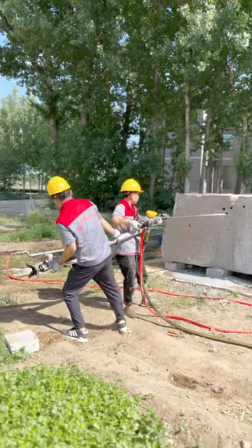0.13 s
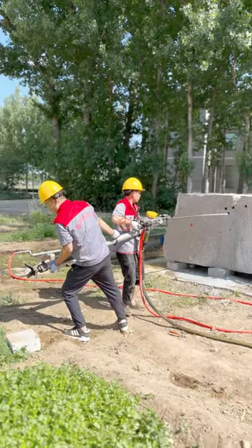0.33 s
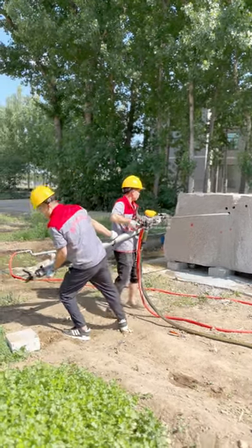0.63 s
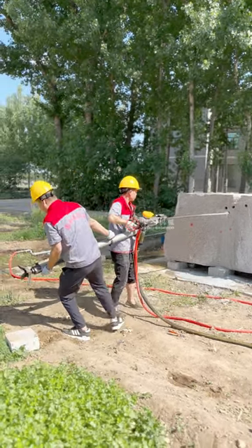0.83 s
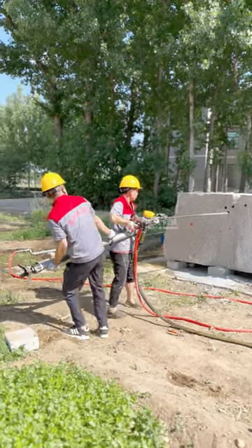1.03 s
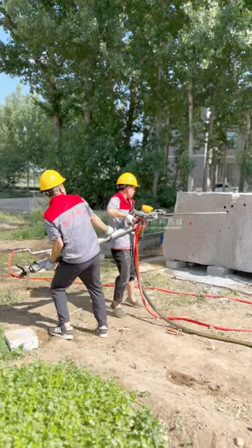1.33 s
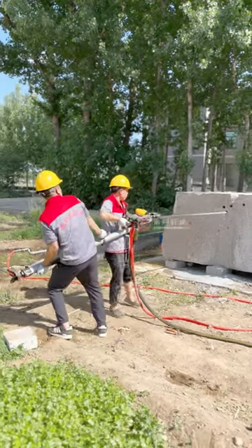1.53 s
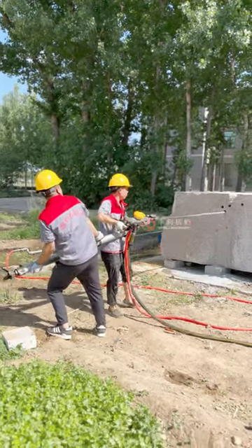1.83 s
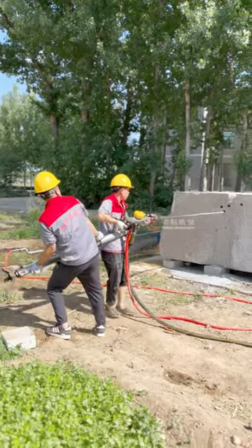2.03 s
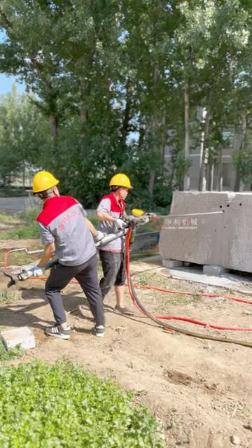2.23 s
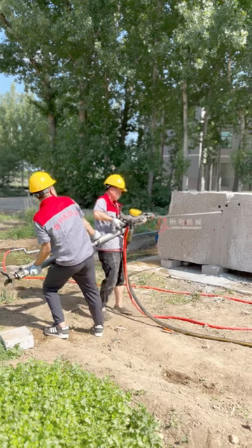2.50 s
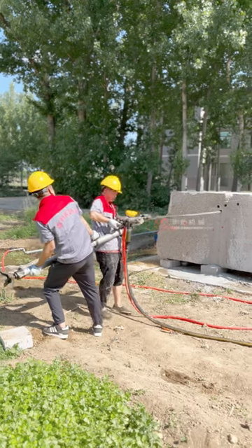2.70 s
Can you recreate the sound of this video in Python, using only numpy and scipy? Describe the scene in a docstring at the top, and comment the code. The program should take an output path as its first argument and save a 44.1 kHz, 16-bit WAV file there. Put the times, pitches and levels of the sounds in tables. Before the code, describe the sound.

An air-powered rock drill runs from 0 to about 2.9 seconds without starting or stopping, hammering roughly 25 times a second. Low coarse exhaust puffs fuse into a roar under pulsing air hiss, with fast bright steel clicks and rattles. A breathy whistling note near 1100 Hz weakens after about 1 second as the roar's tone shifts; metallic ringing swells briefly near 1.55 and 2.3 seconds. Open air, dry, wide stereo.

```python
"""A low, coarse roar at about 25 piston cycles a second: an air-driven rock drill, in the open air.
Exhaust puffs time the multiples of the cycle rate in the roar, and the port whistles a breathy note.
Clicks and rattles ring the modes of steel and housing; shaped noise with bursts makes the hiss.
Left and right differ in phase, level and likeness by frequency, which widens the image."""
import sys
import numpy as np
from scipy import signal
from scipy.fft import rfft, irfft, next_fast_len
from scipy.io import wavfile

SR = 44100
rng = np.random.default_rng(int(sys.argv[2]) if len(sys.argv) > 2 else 0)


def boost_factor(decibels):
    """Convert a level in decibels to a linear amplitude factor."""
    exponent = np.asarray(decibels, float) / 20
    return 10 ** exponent


def bounce(signal):
    """Save signal as a 16-bit WAV file at the path given by the first command-line argument."""
    frames = np.transpose(np.atleast_2d(signal))
    limited = np.clip(frames, -1, 1)
    pcm = np.round(limited * 32767).astype(np.int16)
    wavfile.write(sys.argv[1], SR, pcm)


N = 126126

# Piston clock. Each row: time in seconds, cycles done.
CLOCK = [(-.039, -3), (.0807, 0), (.3998, 8), (.7199, 16), (1.0404, 24), (1.3612, 32), (1.4416, 34),
         (1.5637, 37), (1.846, 44), (2.0884, 50), (2.4139, 58), (2.7407, 66), (2.9037, 70)]
# Ringing parts, named by the contact table. Each row: mode in Hz, width in Hz.
ROD = [(8200, 170), (8390, 140), (8640, 190)]
# Modes of the shank, same columns: mode in Hz, width in Hz.
SHANK = [(4110, 110), (4250, 110), (4440, 200)]
# Modes of the housing, same columns: mode in Hz, width in Hz.
HOUSING = [(2700, 200), (3080, 170), (3280, 120), (3500, 220)]
# Modes of the valve, same columns: mode in Hz, width in Hz.
VALVE = [(1930, 110), (2130, 110)]
# Modes of the collar, same columns: mode in Hz, width in Hz.
COLLAR = [(5950, 150), (7150, 350)]
# Modes of the chuck, same columns: mode in Hz, width in Hz.
CHUCK = [(11300, 700), (12600, 900)]


def rms_one(x):
    """Scales to rms 1."""
    return x / np.sqrt(np.mean(x ** 2) + 1e-20)


def in_time(rows):
    """Columns of a curve at every sample."""
    s, *columns = np.transpose(rows)
    return [np.interp(np.arange(N) / SR, s, column) for column in columns]


def drift(corner_hz):
    """Slow random curve of rms about 1: noise through two equal poles, drawn every 40 samples."""
    r = np.exp(-2 * np.pi * corner_hz * 40 / SR)
    noise = rng.standard_normal(N // 40 + 1002)
    slow = signal.lfilter([1], [1, -2 * r, r * r], noise)[1000:]
    return np.interp(np.arange(N) / 40, np.arange(len(slow)), rms_one(slow))


def resonate(x, hz, width_hz):
    """Two-pole resonance, gain about 1 on top."""
    r = np.exp(-np.pi * width_hz / SR)
    poles = [1, -2 * r * np.cos(2 * np.pi * hz / SR), r * r]
    return signal.lfilter([(1 - r * r) / 2, 0, (r * r - 1) / 2], poles, x)


def bursts(place, decay_ms):
    """One rising and dying envelope a cycle, of uneven strength and timing; also its first touch."""
    jitter_ms, spread_db, rise_ms = .25, 1.6, .3
    s, turns = np.transpose(CLOCK)
    cycle = np.arange(turns[0], turns[-1])
    luck = rng.standard_normal((len(cycle), 2))
    at = (np.interp(cycle + place, turns, s) + jitter_ms / 1000 * luck[:, 0]) * SR
    inside = (at >= 0) & (at < N - 1)
    first = np.full(N, 1e-18)
    first[at[inside].astype(int)] = boost_factor(spread_db * luck[inside, 1])
    fall = np.exp(-1000 / (decay_ms * SR))
    rise = np.exp(-1000 / (rise_ms * SR))
    dying = signal.lfilter([1], [1, -fall], first)
    return signal.lfilter([1 - rise], [1, -rise], dying), first


def air():
    """Broad air noise that swells when the valves open."""
    # Hiss bursts. Each row: place in cycle 0-1, drive over the steady hiss in dB, decay in ms.
    jets = [(.02, 2, 5.0), (.33, 1, 3.0), (.75, -10.5, 2.0), (.945, 5.5, 1.2)]
    # Air colour. Each row: Hz, relative density in dB.
    air_colour = [(40, -16), (100, -5), (200, -6), (330, -4), (470, -7), (650, -5), (800, -6), (950, -9),
                  (1350, -9), (1700, -14), (2100, -11), (2480, -11.5), (3200, -10), (3800, -14.5),
                  (4300, -12), (5300, -13), (5950, -8), (6400, -12), (7400, -13), (7750, -16), (9500, -14),
                  (11300, -16), (12200, -20), (14000, -21), (15000, -22), (15800, -22.5)]
    level_db, flicker_db, flicker_hz = -26.5, .7, 13.7
    swell = 1 + sum(boost_factor(db) * bursts(place, decay_ms)[0] for place, db, decay_ms in jets)
    noise = rng.standard_normal((2, N)) * swell * boost_factor(flicker_db * drift(flicker_hz))
    colour_hz, colour_db = np.transpose(air_colour)
    hz = np.fft.rfftfreq(N, 1 / SR)
    gain = boost_factor(np.interp(np.log(hz + 1), np.log(colour_hz + 1), colour_db))
    return boost_factor(level_db) * rms_one(irfft(rfft(noise) * gain, N))


def port(turns, feed):
    """Air leaving the port whistles a breathy note for part of each cycle, later under heavier feed."""
    # Centre of the note in the cycle 0-1: at light feed, at heavy feed.
    port_at = (.17, .42)
    note_hz, width_hz, half_length_cycles = 1098, 130, .1
    light_db, heavy_db = -37.5, -45
    wander_rad, wander_hz, breath_share = 1.5, 25.0, .35
    centre = port_at[0] + feed * (port_at[1] - port_at[0])
    off_centre = (turns - centre + .5) % 1 - .5
    gate = np.exp(-.5 * (off_centre / half_length_cycles) ** 2)
    wander = wander_rad * np.array([drift(wander_hz), drift(wander_hz)])
    whistle = np.cos(2 * np.pi * note_hz * np.arange(N) / SR + wander)
    breath = resonate(rng.standard_normal((2, N)), note_hz, width_hz)
    breath = rms_one(resonate(breath, note_hz, width_hz))
    note = rms_one(gate * (whistle + breath_share * breath))
    return boost_factor(light_db + feed * (heavy_db - light_db)) * note


def knocks():
    """Each contact is a click and a dying rattle that ring one part's modes; two draws of the rattle."""
    # Each row: part struck, place in cycle 0-1, relative drive in dB, rattle decay in ms.
    contacts = [(ROD, .335, 6.5, .6), (ROD, .425, 4.5, .8), (ROD, .495, 1, 1.2), (ROD, .785, 4, .7),
                (ROD, .03, -4, 1.5), (COLLAR, .335, -4, .8), (COLLAR, .02, -13, 1.2), (SHANK, .74, -1, 1.5),
                (SHANK, .945, 0, .5), (SHANK, .01, -7, 1.2), (HOUSING, .025, -4, 1.4),
                (HOUSING, .28, -2, 1.2), (HOUSING, .44, -6.5, 2.5), (HOUSING, .765, -5, .7),
                (HOUSING, .945, -5.5, .7), (VALVE, .955, -11, 1.0), (VALVE, .04, -10, 2.5),
                (VALVE, .3, -7.5, 4.0), (VALVE, .76, -10, 1.5), (CHUCK, .68, -6, 1.2), (CHUCK, .76, 0, 1.0),
                (CHUCK, .945, -2, .7)]
    # Shank and housing ring harder at times. Each row: seconds, shank in dB, housing in dB.
    swells = [(0, 7, -1.5), (.08, 6, -1.5), (.2, -7, .6), (.45, -2.5, 1.5), (.9, 2, .6), (1.3, 2.1, -1.5),
              (1.55, 6, -1.5), (1.7, 1.5, -.6), (2.1, 3, -.6), (2.3, 10.5, -1.5), (2.45, -2.5, -2.5),
              (2.86, -.6, -2.5)]
    first_db, rattle_per_s = 1.5, 1800
    loose_db, loose_hz = 2.0, 15.0  # all parts but the rod are struck less evenly
    shank_db, housing_db = in_time(swells)
    out = 0
    for part, place, db, decay_ms in contacts:
        envelope, first = bursts(place, decay_ms)
        rattle = envelope * (rng.random((2, N)) < rattle_per_s / SR)
        touches = (boost_factor(first_db) * first + rattle) * rng.choice([-1, 1], (2, N))
        if part != ROD:
            db = db + loose_db * drift(loose_hz)
        if part == SHANK:
            db = db + shank_db
        if part == HOUSING:
            db = db + housing_db
        for k, (hz, width_hz) in enumerate(part):
            ring = resonate(boost_factor(db) * touches, hz, width_hz)
            out = out + ring * SR / width_hz / 4 * (-1) ** k
    return out


def roar(turns, feed):
    """Multiples of the cycle rate, lined up on the exhaust puffs; narrow puffs lead the high ones."""
    # Each row: place in cycle 0-1 at light feed, at heavy, pressure step at light, at heavy, width in ms.
    puffs = [(.119, .141, -.57, -.91, .94), (.177, .213, .54, -.03, .58), (.297, .298, -.68, -.33, .56),
             (.349, .345, -1.0, -.69, .84), (.425, .428, -.69, -1.0, 1.37), (.64, .625, -1.56, -.61, 2.54),
             (.716, .557, -.15, -.28, 1.47), (.709, .765, -.23, .26, .3), (.804, .783, -1.14, .01, .2),
             (.892, .922, -.53, .16, .53), (.987, .972, .34, .79, .87)]
    # Each row: multiple of the cycle rate, relative level in dB at light, middle and heavy feed.
    order_levels = [(1, -41, -42, -40), (2, -11.5, -9.5, -10), (3, -38, -23, -16), (4, -2.5, -0.5, -.5),
                    (5, -6.5, -2.5, -0.5), (6, 0, -4, -11), (7, -15, -20, -8.5), (8, -20, -11.5, -13.5),
                    (9, -5, -2, -4.5), (10, -8, -22, -27), (11, -12.5, -11, -19), (12, -6.5, -2.5, -6),
                    (13, -5, -6, -9.5), (14, -9, -16, -8.5), (15, -13.5, -9.5, -5), (16, -14.5, -10.5, -8),
                    (17, -18, -18, -20), (18, -19, -20.5, -11.5), (19, -18, -35, -16.5),
                    (20, -15.5, -14, -18.5), (21, -20, -22, -15.5), (22, -7, -10.5, -19),
                    (23, -18, -18, -12.5), (24, -20, -15, -21), (25, -13.5, -10, -20),
                    (26, -12, -17.5, -19), (27, -25, -23, -16.5), (28, -37, -18, -16), (29, -31, -17, -22),
                    (30, -31, -37, -25), (31, -27, -25, -20), (32, -33, -30, -21.5)]
    waver_db, waver_rad, waver_hz = .8, .009, 6.0  # dB at the 4th multiple, rad per multiple
    light_at, heavy_at, light, heavy, width_ms = np.transpose(puffs)
    lean = np.linspace(0, 1, 41)[:, None]
    place = light_at + lean * (heavy_at - light_at)
    pressure = light + lean * (heavy - light)
    out = 0
    for k, *db in order_levels:
        blur = np.exp(-2 * (np.pi * k * 25 * width_ms / 1000) ** 2)  # at 25 cycles a second
        shape = pressure * width_ms * blur * np.exp(-2j * np.pi * k * place)
        start = np.interp(feed, lean[:, 0], np.unwrap(np.angle(shape.sum(axis=1))))
        level_db = np.interp(feed, [0, .6, 1], db)
        level = boost_factor(level_db + waver_db * np.sqrt(k / 4) * drift(waver_hz))
        out = out + level * np.cos(2 * np.pi * k * turns + start + waver_rad * k * drift(waver_hz))
    return rms_one(out)


def stereo_image(middle, second_draw):
    """Sets left-right phase, level and likeness by frequency; a second noise draw widens the image."""
    # Stepped table. Each row: Hz, left minus right phase in radians, left minus right in dB, likeness 0-1.
    pair = [(0, 0, 0, 1), (260, -.28, -1, .995), (600, -.55, -2.8, .98), (900, -.45, -1.5, .92),
            (1120, -.08, -.2, .97), (1400, -.18, -.2, .91), (1650, 0, 0, 1), (1830, 0, 0, 1),
            (2150, 1.06, -2.1, .85), (2550, 2.26, 1.2, .82), (3300, .37, -4, .67), (4000, 1.27, -1.8, .7),
            (5000, 1.02, -1.5, .76), (5350, 2, -1, .75), (5750, np.pi, 0, 1), (6150, np.pi, 0, 1),
            (6400, 3.85, 0, .85), (7450, 5.6, 0, .85), (7650, 2 * np.pi, 0, 1), (8200, 2 * np.pi, 0, 1),
            (8800, 7.35, 0, .9), (9500, 8.5, 0, .8), (9850, 3 * np.pi, 0, 1), (10450, 3 * np.pi, 0, 1),
            (10850, 10.1, 0, .8), (11600, 11.4, 0, .8), (12050, 4 * np.pi, 0, 1), (13000, 4 * np.pi, 0, 1),
            (13250, 13.7, 0, .65), (14000, 15.1, 0, .7), (14400, 5 * np.pi, 0, 1), (15150, 5 * np.pi, 0, 1),
            (15400, 16.2, 0, .6), (16000, 16.5, 0, .6)]
    size = next_fast_len(N + 4096)
    hz = np.fft.rfftfreq(size, 1 / SR)
    side = np.array([[1], [-1]])
    pair_hz, *columns = np.transpose(pair)
    phase_rad, bias_db, alike = (np.interp(hz, pair_hz, column) for column in columns)
    common = np.sqrt((1 + alike) / 2) * rfft(middle, size)
    differing = side * np.sqrt((1 - alike) / 2) * rfft(second_draw, size)
    turned = (common + differing) * np.exp(.5j * side * phase_rad)
    return irfft(turned * boost_factor(side * bias_db / 2), size)[:, :N]


def scene():
    """The drill in stereo: air, port note, knocks and roar."""
    # Each row: seconds, roar level in dB, feed 0-1 (how far the drill is leaned on), steel gain in dB.
    work = [(0, -20.3, .0, -33), (.4, -20.3, .05, -33), (.8, -20.3, .1, -33.5), (1.1, -20.7, .4, -35.5),
            (1.4, -20.7, .6, -35), (1.8, -21, .75, -35.5), (2.2, -21.2, .9, -35.5),
            (2.5, -21.5, 1.0, -32.5), (2.86, -21.3, 1.0, -32)]
    turns, = in_time(CLOCK)
    roar_db, feed, steel_db = in_time(work)
    feed = np.clip(feed, 0, 1)
    middle, second_draw = air() + port(turns, feed) + boost_factor(steel_db) * knocks()
    return stereo_image(middle + boost_factor(roar_db) * roar(turns, feed), second_draw)


def band_limit(x):
    """A steep low-pass at the top of the band."""
    return signal.sosfilt(signal.butter(12, 16090, fs=SR, output="sos"), x)


def record(dry):
    """The top is cut and the microphone drops the lowest rumble."""
    top_hz, rumble_hz = 15730, 28
    top_cut = signal.ellip(12, .5, 70, top_hz, fs=SR, output="sos")
    rumble_cut = signal.butter(2, rumble_hz, "high", fs=SR, output="sos")
    mix = signal.sosfilt(rumble_cut, signal.sosfilt(top_cut, dry))
    return band_limit(mix)


dry = scene()
out = record(dry)
bounce(out)
```